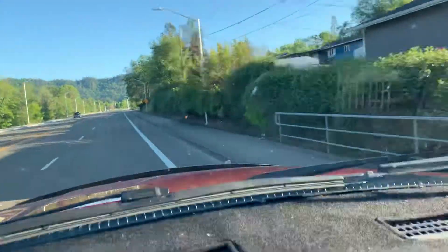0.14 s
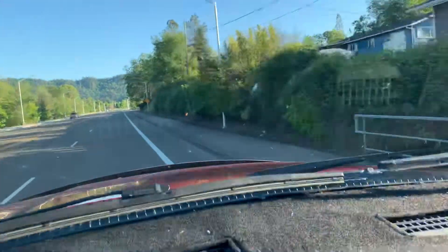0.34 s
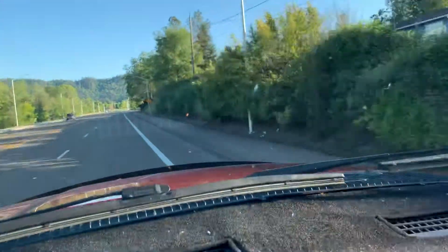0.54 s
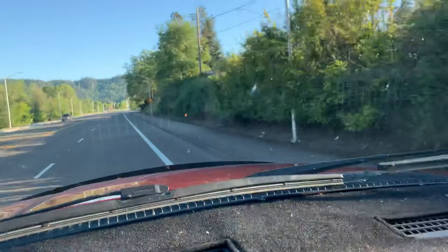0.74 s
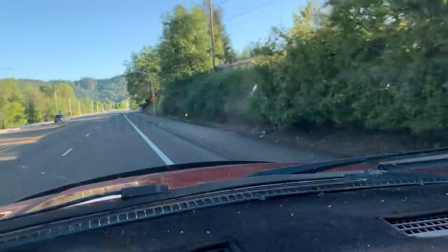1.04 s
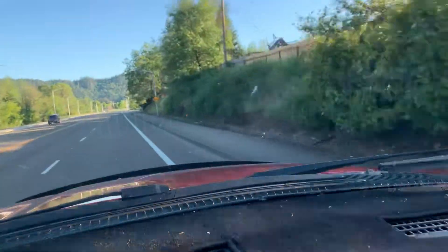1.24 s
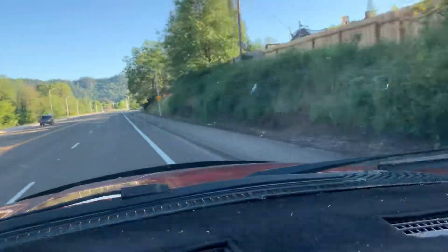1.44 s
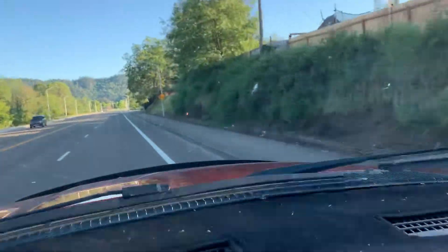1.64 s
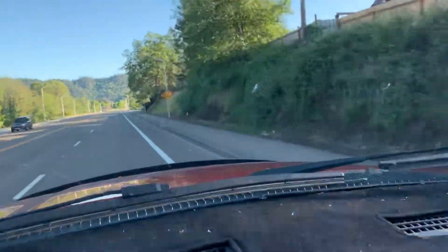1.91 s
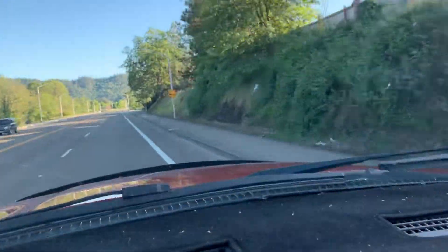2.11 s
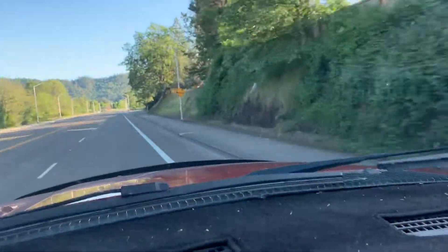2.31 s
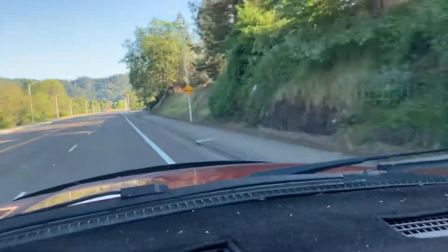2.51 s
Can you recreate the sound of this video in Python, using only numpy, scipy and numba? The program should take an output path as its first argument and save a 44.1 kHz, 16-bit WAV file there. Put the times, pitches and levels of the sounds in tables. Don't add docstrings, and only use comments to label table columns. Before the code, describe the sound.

Diesel truck engine pulls harder with rising turbo whine, then a sharp hissing air release on the shift

```python
import sys
import numpy as np
from scipy import signal
from scipy.fft import rfft, irfft, next_fast_len
from scipy.io import wavfile
from scipy.ndimage import uniform_filter1d
from numba import njit

SR = 44100
rng = np.random.default_rng(int(sys.argv[2]) if len(sys.argv) > 2 else 0)


def to_wav(s):
    ch = np.atleast_2d(s).T
    pcm = np.round(np.clip(ch, -1, 1) * 32767)
    wavfile.write(sys.argv[1], SR, pcm.astype(np.int16))


def magnitude_from_level(level_db):
    exponent = np.asarray(level_db, float) / 20
    return 10 ** exponent


N = 117747
T = np.arange(N) / SR
M = next_fast_len(N, True)
FREQ = np.maximum(np.arange(M // 2 + 1) * SR / M, 1)

# frequency in Hz, lead of the right port in radians, likeness 0-1.
MIC_PORTS = [(50, 0.3, 0.86), (106, -0.6, 0.92), (200, -1.5, 1), (265, -2.5, 0.98), (312, -3.5, .85),
             (381, -5, 0.86), (392, -5, 0.96), (430, -5, .6), (489, -5, 0.4), (512, -4, 0.2),
             (526, -6.5, 0.5), (604, -9, 0.65), (1580, -8, 0.36), (2270, -6.5, 0.1), (12000, -6, 0)]


def curve(table):
    rows = np.array(table, float)
    return [np.interp(T, rows[:, 0], column) for column in rows[:, 1:].T]


def over_hz(table, axis=1):
    rows = np.array(table, float)
    return np.interp(np.log(FREQ), np.log(rows[:, 0]), rows[:, axis])


def unit(x):
    return x / np.sqrt(np.mean(x ** 2))


@njit
def svf(x, hz, width):
    y, band, low = np.empty(len(x)), 0., 0.
    for i in range(len(x)):
        g = np.tan(np.pi * hz[i] / SR)
        k = width[i] / hz[i]
        v = (band + g * (x[i] - low)) / (1 + g * (g + k))
        band = 2 * v - band
        low = low + 2 * g * v
        y[i] = k * v
    return y


def walk(rate):
    hold = int(SR / rate)
    steps = np.repeat(rng.standard_normal(size=2000), hold)[:N]
    return 1.44 * uniform_filter1d(uniform_filter1d(steps, hold), hold)


def pair():
    like = over_hz(MIC_PORTS, axis=2)
    common, different = rfft(rng.standard_normal((2, M)))
    common = common * np.sqrt((1 + like) / 2)
    different = different * np.sqrt((1 - like) / 2)
    return irfft(np.array([common + different, common - different]), M)[:, :N]


def coloured(x, shape, flicker_db):
    spec, out = rfft(x, M) * magnitude_from_level(over_hz(shape)), 0
    for octave in np.arange(4, 15, 1.):
        band = np.clip(1 - abs(np.log2(FREQ) - octave), 0, 1)
        out = out + irfft(spec * band, M)[:, :N] * magnitude_from_level(flicker_db * walk(9.18))
    return unit(out)


def ringing(hz, width):
    hz, width = hz + 0 * T, np.maximum(width + 0 * T, 10)
    rung = np.array([svf(svf(x, hz, width), hz, width) for x in pair()])
    return rung * np.sqrt(4 * SR / (np.pi * 2 * width))


def tone(turn, order, db):
    return np.sqrt(2) * magnitude_from_level(db) * np.sin(order * turn + 2 * np.pi * rng.random())


def exhaust(turn, boom_db, firing_db, load):
    # shaft order, dB at half load, dB at three quarters, dB at full load, dB after lift-off.
    shaft_orders = [(2, -21, -21, -22, -24.5), (4, -35, -30, -28, -23.5), (5, -30, -39, -40, -25),
                    (7, -35, -38, -23.5, -25), (8, -34, -33, -24, -35), (9, -29, -28, -43, -35),
                    (10, -44, -37, -24.5, -45), (11, -46, -31, -23.5, -32), (13, -44, -36, -20, -23.5),
                    (14, -39, -37.5, -27, -45), (15, -36, -33.5, -26.5, -53), (16, -39.5, -42.5, -28, -30),
                    (17, -48, -53, -34, -52), (18, -40.5, -46, -28, -50)]
    wander_db, idle_loss_db, coast_loss_db = 1.5, 8.5, 17
    lift_off_s, lift_time_s = 2.212, 0.14

    out = tone(turn, 3, boom_db + 0.23 * walk(12))
    out = out + tone(turn, 6, firing_db + 2.5 + 1.56 * walk(14))
    second_db = -13 + 0.67 * firing_db - 22 * np.maximum(.5 - load, 0)
    out = out + tone(turn, 12, second_db + wander_db * walk(13.52))

    lifted = np.clip((T - lift_off_s) / lift_time_s, 0, 1)
    for order, half_db, most_db, full_db, coast_db in shaft_orders:
        pull_db = np.interp(4 * load, [0, 2, 3, 4], [half_db - idle_loss_db, half_db, most_db, full_db])
        db = pull_db + lifted * (coast_db - coast_loss_db * (.7 - load) - pull_db)
        out = out + tone(turn, order, db + wander_db * walk(10.18))
    for order in np.arange(1, 17) + .5:
        out = out + tone(turn, order, -40 - 12 * (1 - load) + 2 * wander_db * walk(8.12))
    return out


def clatter(turn, load):
    # frequency in Hz, level in dB per Hz.
    knock_colour = [(190, -2), (290, 9.5), (600, -0.5), (800, -0.5), (2200, -1), (4000, -9.5), (7000, -16),
                    (15000, -24)]
    # centre in Hz, width in Hz, level in dB.
    panels = [(810.5, 45, -35.5), (1373, 48, -39), (1995, 330, -41)]
    knock_db, load_loss_db, sharpness, scatter_db = -26, 17, 0.32, 1
    bite_s, bite_length_s, bite_db = 0.91, 0.12, 4.5
    peak_s, peak_length_s, peak_db = 1.93, 0.08, 1.5

    beat = 3 * turn / (2 * np.pi)
    size = magnitude_from_level(scatter_db * rng.standard_normal(size=2000))[beat.astype(int)]
    gate = uniform_filter1d(size * np.exp(-sharpness * (beat % 1)), size=40)
    out = magnitude_from_level(knock_db) * coloured(pair() * gate, knock_colour, 1)
    for hz, width, db in panels:
        out = out + magnitude_from_level(db + 4.1 * walk(9.96)) * ringing(hz, width)
    bite = bite_db * np.exp(-((T - bite_s) / bite_length_s) ** 2)
    peak = peak_db * np.exp(-((T - peak_s) / peak_length_s) ** 2)
    return out * magnitude_from_level(bite + peak - load_loss_db * (1 - load))


def turbo():
    # time in seconds, blade whine in Hz, level in dB.
    spool = [(0, 9300, -42), (.12, 8400, -50.5), (.25, 7350, -56.5), (.5, 6180, -58), (.65, 6130, -54),
             (.82, 6480, -65), (1.0, 7148, -53.5), (1.36, 8370, -50.5), (1.6, 9432, -48),
             (2.0, 11330, -49.5), (2.2, 11720, -51), (2.33, 11600, -37), (2.45, 11000, -43.5),
             (2.55, 9650, -40.5), (2.67, 9300, -51)]
    duct_hz, duct_width_hz = 10050, 3100
    intake_hz, intake_width_hz, intake_db = 8130, 290, -4

    hz, db = curve(spool)
    hz = uniform_filter1d(hz, size=2500)
    duct = 1 / (1 + ((hz - duct_hz) / duct_width_hz) ** 2)
    whoosh = magnitude_from_level(5) * ringing(hz * 0.945, 1500) * duct
    intake = magnitude_from_level(intake_db) * np.clip(hz / intake_hz, 0, 1) ** 6 * ringing(intake_hz, intake_width_hz)
    blade_hiss = magnitude_from_level(-2) * (hz / 11500) ** 4 * ringing(13020.0, 2600)
    whine = 0.56 * ringing(hz, 120) + 0.69 * np.sin(2 * np.pi * np.cumsum(hz) / SR)
    return magnitude_from_level(db + 3.5 + 1.4 * walk(20)) * (whine + whoosh + intake + blade_hiss)


def valve():
    # opening in seconds, attack in seconds, hold in seconds, fade in dB per second, level in dB,
    # share of the mid-range that is missing 0-1.
    releases = [
        (-.3, 0.041, 0.34, 82, -31, 0.3),
        (-.3, 0.034, 0.436, 200, -43, 0.3),
        (2.243, 0.029, 0.12, 12, -29, 0.09),
        (2.284, 0.014, .01, 300, -40, .05),
        (2.359, 0.021, 0.015, 295, -34.5, 0.4),
    ]
    # frequency in Hz, level in dB per Hz.
    jet_colour = [(530, -37), (900, -11), (1340, -4.5), (1600, -15), (1800, -8), (3320, -8), (5200, -8),
                  (10100, -11.5), (14800, -12.5), (15000, -32)]
    # start in seconds, end in seconds, level in dB.
    seat_sizzle = [
        (2.24, 2.28, -19),
        (2.33, 2.42, -15),
    ]
    # time in seconds, whistle in Hz, width in Hz, level in dB.
    early_whistle = [(0, 9700, 900, -35), (.05, 9330, 700, -27.5), (.1, 9600, 900, -36),
                     (.16, 9100, 1200, -54), (.24, 9000, 1200, -73)]
    shift_whistle = [(2.381, 8040, 150, -50), (2.44, 8340, 150, -36), (2.475, 8120, 150, -26.5),
                     (2.505, 8150, 130, -22.5), (2.529, 8235, 200, -30), (2.533, 9400, 1000, -32),
                     (2.58, 9650, 1000, -33), (2.63, 9750, 799.7, -30), (2.67, 9300, 800, -49.5)]

    flow = thin = 0
    for start, attack, hold, fade_db, db, missing in releases:
        fading_s = np.maximum(T - start - attack - hold, 0)
        puff = np.clip((T - start) / attack, 0, 1) * magnitude_from_level(db - fade_db * fading_s)
        flow, thin = flow + puff, thin + puff * missing
    jet = coloured(pair(), jet_colour, 0.91)
    mid_range = np.array([svf(x, 4000 + 0 * T, 7000 + 0 * T) for x in jet])
    jet = jet - thin / flow * mid_range
    pipe = magnitude_from_level(-13.5) * ringing(2944, 120)
    out = flow * magnitude_from_level(1.5 * walk(25.27)) * (jet + pipe)

    sizzle = 0
    for start, end, db in seat_sizzle:
        sizzle = sizzle + magnitude_from_level(db) * np.clip(np.minimum(T - start, end - T) / .008, 0, 1)
    out = out + sizzle * ringing(15450., 600)

    for table in (early_whistle, shift_whistle):
        hz, width, db = curve(table)
        on = (T > table[0][0] - .02) & (T <= table[-1][0])
        whistle = ringing(hz * (1 + 0.0052 * walk(60)), width)
        out = out + on * magnitude_from_level(db + 0.5 * walk(70)) * whistle
    return out


def road(load):
    # frequency in Hz, level in dB per Hz.
    rumble_colour = [(20, -9), (55, 0.5), (120, -2), (200, -2), (260, -13), (320, -13.5), (440, -8.5),
                     (700, -32)]
    # frequency in Hz, level in dB per Hz.
    air_colour = [(400, -37), (600, -3), (900, -4.5), (1450, -6), (1800, -20), (2900, -25.5), (6300, -28),
                  (11500, -41), (15000, -44)]
    # time in seconds, level in
    # dB.
    drumming = [(1.5, -52), (1.9, -35), (2.15, -29), (2.3, -23), (2.45, -29), (2.55, -30), (2.67, -36)]

    other_side = np.array([[1], [-1]])
    drum = magnitude_from_level(curve(drumming)[0]) * ringing(289, 166) * other_side
    rumble = magnitude_from_level(-20 - 1.5 * load) * coloured(pair(), rumble_colour + [(1400, -90)], 3.3)
    air = magnitude_from_level(-32.5) * coloured(pair(), air_colour, 0.78)
    return drum + rumble + air


def bumps():
    # start in seconds, starting pitch in Hz, level in dB.
    thumps = [
        (.0, 110.4, -21),
        (0.27, 170, -16.5),
        (0.383, 150, -14.5),
        (.54, 90, -20),
        (.63, 129.2, -13),
        (2.62, 130.6, -11.5),
    ]
    decay_s, sag_share = 0.034, 0.462
    out = 0
    for start, hz, db in thumps:
        age = np.maximum(T - start, 0) / decay_s
        sag = 1 - sag_share * (1 - np.exp(-age / 2))
        swell = np.e * age * np.exp(-age)
        out = out + magnitude_from_level(db) * swell * np.sin(2 * np.pi * np.cumsum(hz * sag) / SR)
    return out


def scene():
    # time in seconds, shaft speed in Hz, cab boom in dB, firing pulse in dB, load 0-1.
    engine = [(0, 31.27, -27.5, -28, 0.07), (.3, 31.32, -27, -23, 0.15), (.6, 31.43, -27, -27, 0.07),
              (.75, 31.5, -15.5, -23.5, 0.19), (.88, 32.27, -10.5, -23, 0.44), (1.2, 32.72, -12, -20, 0.62),
              (1.5, 33.06, -10.5, -20.5, 0.78), (1.8, 33.48, -11.5, -16.5, 0.95),
              (2.1, 34.08, -10.5, -13.5, 1), (2.2, 34.17, -11, -21, 0.83), (2.3, 34.35, -11, -28, 0.81),
              (2.48, 34.21, -15.5, -25.5, 0.45), (2.59, 34.35, -23.5, -45, 0), (2.67, 35.5, -17, -35, 0.06)]
    hz, boom_db, firing_db, load = curve(engine)
    turn = 2 * np.pi * np.cumsum(hz * (1 + 0.0014 * walk(10.26))) / SR
    motor = exhaust(turn, boom_db, firing_db, load) + clatter(turn, load)
    return motor + turbo() + valve() + road(load) + bumps()


def roll_off(x):
    return signal.sosfilt(signal.butter(12, 15850, fs=SR, output="sos"), x)


def record(dry):
    # frequency in Hz, gain in dB.
    right_treble = [(7000, 0), (7900, 0), (8050, 5), (10000, 6.5), (10700, 4), (11500, -3)]
    # frequency in Hz, gain of the common part in dB, gain of the difference in dB.
    thin_top = [(10760, 0, -0.5), (11840, -14.5, 3), (12400, -25, 5), (12300, 1.5, -4), (14430, 1, -6),
                (14500, -27, 8), (15000, -27, 5), (15050, -28, -28), (15750, -28, -28), (15850, -60, -60)]

    lead = np.exp(.5j * over_hz(MIC_PORTS))
    left, right = rfft(dry, M) * np.array([1 / lead, lead * magnitude_from_level(over_hz(right_treble))])
    mid = (left + right) / 2 * magnitude_from_level(over_hz(thin_top))
    side = (left - right) / 2 * magnitude_from_level(over_hz(thin_top, axis=2))
    ports = irfft(np.array([mid + side, mid - side]), M)[:, :N]
    return roll_off(np.tanh(0.82 * ports) / .82)


dry = scene()
out = record(dry)
to_wav(out)
```